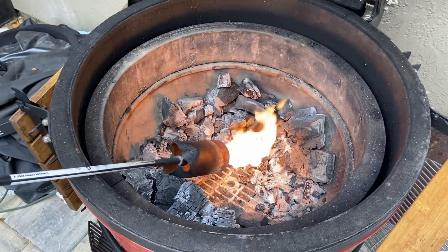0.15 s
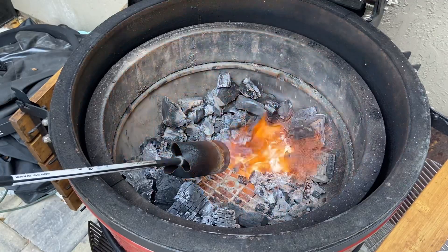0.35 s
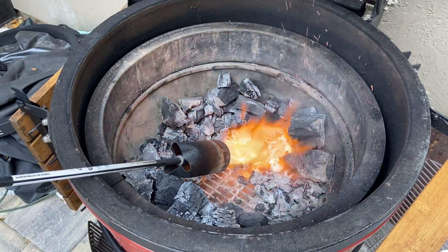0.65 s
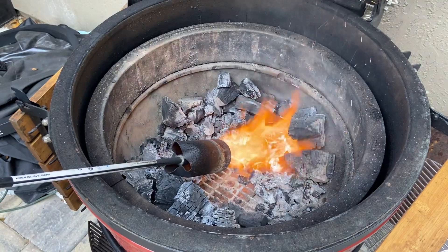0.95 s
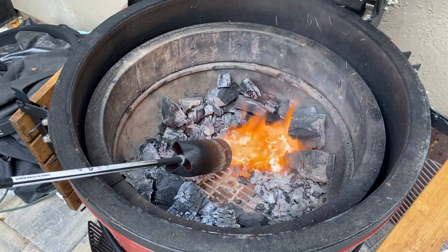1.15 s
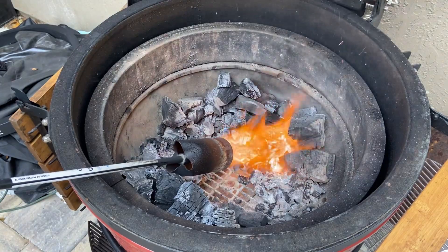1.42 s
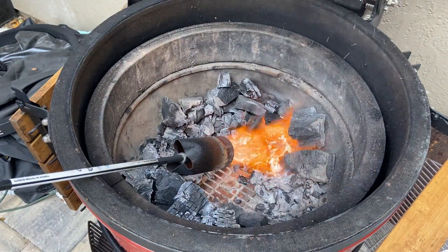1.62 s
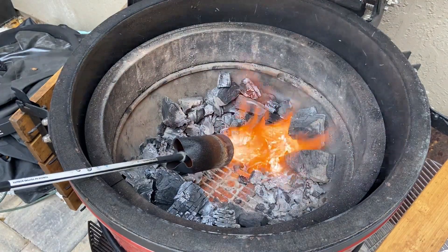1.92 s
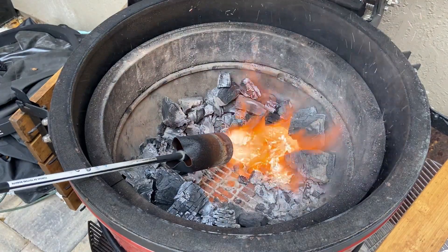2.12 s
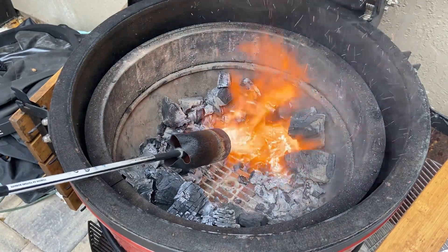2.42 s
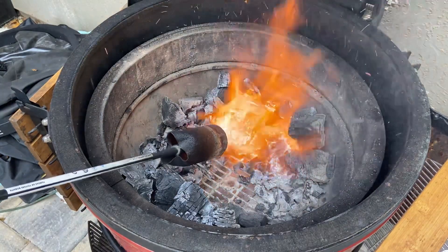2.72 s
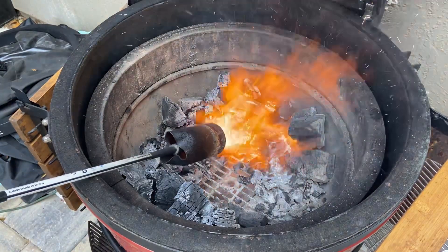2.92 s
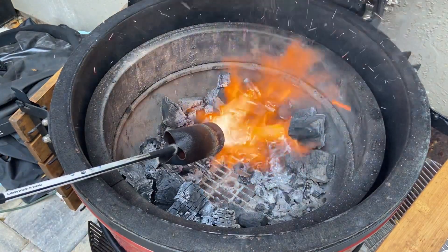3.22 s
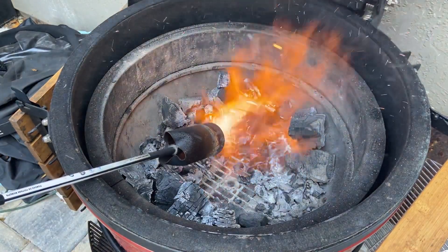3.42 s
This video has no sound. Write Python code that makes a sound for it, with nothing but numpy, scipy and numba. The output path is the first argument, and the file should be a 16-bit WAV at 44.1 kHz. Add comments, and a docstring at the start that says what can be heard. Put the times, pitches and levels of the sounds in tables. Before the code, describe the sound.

A gas torch burns very quietly for an instant, then bursts into a loud, deep, hollow roar inside a charcoal grill bowl. It flutters and shifts in tone, easing near the end; close stereo microphone outdoors.

```python
"""In a deep ceramic grill bowl, a gas torch flares from pilot to full blast into lump charcoal.
Noise for the turbulent burning rings the bowl, the coals and the burner cup; filtered clicks are sparks.
Brighter noise makes the rush through the gaps in the coals and the hiss of the gas jet.
As the torch moves over the coals the resonances shift. Two microphone ports hear it,
under a soft ceiling."""
import sys
import numpy as np
from scipy import signal
from scipy.fft import rfft, irfft, next_fast_len
from scipy.io import wavfile
from scipy.ndimage import uniform_filter1d
from numba import njit

SR = 44100
rng = np.random.default_rng(int(sys.argv[2]) if len(sys.argv) > 2 else 0)


def makeup_ratio(level_db):
    """Linear amplitude ratio for a level in decibels (20 dB per factor of ten)."""
    decades = np.asarray(level_db, float) / 20
    return 10 ** decades


def inscribe(sig):
    """Save sig as 16-bit PCM at rate SR to the path in sys.argv[1].

    A 1-D sig is mono; a 2-D sig holds one channel per row.
    Samples are clipped to [-1, 1] before scaling.
    """
    pcm = np.round(np.clip(np.atleast_2d(sig).T, -1, 1) * 32767)
    wavfile.write(sys.argv[1], SR, pcm.astype(np.int16))


N = 156555  # length in samples


def rms_one(x):
    """Scale to unit power."""
    return x / np.sqrt(np.mean(x ** 2) + 1e-20)


def in_time(rows):
    """Join the points of each column by straight lines, one value per sample."""
    s, *columns = np.transpose(rows)
    return [np.interp(np.arange(N) / SR, s, c) for c in columns]


def drift(rate_hz):
    """Random wavering around 0 with a spread of 1; a higher rate wavers faster."""
    hop, settle = 40, 2000  # samples per step, first steps thrown away
    r = np.exp(-2 * np.pi * hop * rate_hz / SR)
    noise = rng.standard_normal(N // hop + settle + 2)
    slow = signal.lfilter([1], [1, -2 * r, r * r], noise)[settle:]
    return np.interp(np.arange(N) / hop, np.arange(len(slow)), rms_one(slow))


def colour(x, points):
    """Weight a spectrum by straight lines on a log-frequency axis."""
    size = next_fast_len(N)
    hz, db = np.transpose(points)
    f = np.arange(size // 2 + 1) * SR / size + 1  # 1 Hz up, so that the log exists
    weight = makeup_ratio(np.interp(np.log(f), np.log(hz), db))
    return rms_one(irfft(rfft(x, size) * weight, size)[:, :N])


@njit
def moving_peak(x, w, half_width, gain):
    """Add a share of a gliding band-pass: a peak if positive, a dip if negative."""
    out = np.empty_like(x)
    for c in range(x.shape[0]):
        x1 = x2 = y1 = y2 = 0.0
        for i in range(x.shape[1]):
            r = np.exp(-half_width[i])
            y = (1 - r * r) / 2 * (x[c, i] - x2) + 2 * r * np.cos(w[i]) * y1 - r * r * y2
            x2, x1, y2, y1 = x1, x[c, i], y1, y
            out[c, i] = x[c, i] + gain[i] * y
    return out


def resonate(x, hz, width_hz, gain):
    """Pass a sound through one moving resonance, with its settings in Hz."""
    return moving_peak(x, 2 * np.pi * hz / SR, np.pi * width_hz / SR, gain)


def turbulence(spectrum, resonances, travel, wander, swell_db, swell_hz):
    """Two unrelated noises with one colour, through wavering resonances that follow the torch."""
    wander_hz = 4.8  # how fast the resonances waver in pitch
    x = colour(rng.standard_normal((2, N)), spectrum)
    for start_hz, end_hz, width_hz, start_db, end_db in resonances:
        hz = start_hz + (end_hz - start_hz) * travel
        hz = hz * (1 + wander * drift(wander_hz))
        db = start_db + (end_db - start_db) * travel + swell_db * drift(swell_hz)
        x = resonate(x, hz, np.full(N, width_hz), makeup_ratio(db) - 1)
    return rms_one(x)


def evened(x, share, span_s):
    """Level evening, as a steadily fed flame holds its level: swells are partly divided out."""
    span = int(span_s * SR)
    power = uniform_filter1d(uniform_filter1d(x[0] ** 2, span), span)
    return rms_one(x / (power + 0.046) ** (share / 2))


def placed(x, lean, own_db):
    """Lean a shared-and-unshared pair to one side and widen or narrow it."""
    shared, own = x
    return np.array([shared, makeup_ratio(own_db) * own + lean * shared])


def bowl_boom(travel):
    """Low turbulent burning rings the air in the deep bowl."""
    # colour of the noise: pitch_hz, level_db
    spectrum = [(20, -48), (40, -13), (65, -4), (100, -5.5), (200, -2.5), (330, -8), (450, -22.5),
                (900, -61)]
    # bowl resonances and dips along the torch's travel: start_hz, end_hz, width_hz, start_db, end_db
    resonances = [(133.2, 146, 34.2, 15, 15), (252.4, 297, 62, 15.5, 19), (180.3, 202.3, 52, -17.5, -8),
                  (319, 332.4, 84, -43, -48)]
    boom = turbulence(spectrum, resonances, travel, wander=0.014, swell_db=0.3, swell_hz=2.5)
    return evened(boom, share=0.24, span_s=0.07)


def coal_roar(travel):
    """Mid-pitched turbulent burning sounds through the resonances of the coals."""
    # colour of the noise: pitch_hz, level_db
    spectrum = [(200, -39), (310, -19), (360, 0), (700, 0.5), (1000, 1.5), (1250, -7.5), (1500, -62),
                (3000, -53)]
    # coal resonances and dips along the torch's travel: start_hz, end_hz, width_hz, start_db, end_db
    resonances = [(340, 464, 57, 9.5, 2.5), (600, 524, 74, 8, 10.5), (492, 576, 30, 2, -10.5),
                  (718, 860, 145, -1.5, -3)]
    return turbulence(spectrum, resonances, travel, wander=0.016, swell_db=0.37, swell_hz=5.4)


def burner_cup():
    """Turbulent noise passes three times through the cup's air resonance."""
    # cup resonance: time_s, pitch_hz, width_hz of one pass, lean to the left (0-1), unshared_db
    cup = [(0, 1145, 203, 0, 12), (.35, 1100, 170, 0, -15), (.5, 1167, 149, 0, -6), (.75, 1126, 138, 0, -6),
           (1.1, 1173, 157, 0, -14), (1.4, 1153, 169, 0, -2), (1.8, 1114, 260, 0.2, -1),
           (2.45, 1170, 306, .02, 2), (2.56, 1070, 74.6, 0.9, 6), (3.55, 1080, 79, 0.9, 0)]
    hz, width_hz, lean, own_db = in_time(cup)
    hz = hz * (1 + 0.0048 * drift(24.0))
    x = rng.standard_normal((2, N))
    for _ in range(3):
        x = resonate(x, hz, width_hz, np.ones(N)) - x  # only the band-pass is left
    x = rms_one(x / np.sqrt(width_hz))  # a wider band would be louder
    return placed(evened(x, share=0.25, span_s=0.071), lean, own_db)


def sparks():
    """Hot charcoal spits small snaps: filtered clicks at chance moments, uneven in size."""
    sparks_per_s = 200  # in each of the two channels
    sizes = makeup_ratio(4.7 * np.minimum(rng.exponential(1, (2, N)), 4))
    signs = rng.choice([-1, 1], (2, N))
    clicks = sizes * signs * (rng.random((2, N)) < sparks_per_s / SR)
    band = signal.butter(2, [2000, 9000], "band", fs=SR, output="sos")
    return rms_one(signal.sosfilt(band, clicks + 1e-18))


def rush_with_sparks(travel):
    """Burning gas rushes through gaps and past a rim, each a resonance; sparks are mixed in."""
    # colour of the noise: pitch_hz, level_db
    spectrum = [(900, -11.5), (1250, -1.5), (1400, 0), (2500, -5), (3500, -12), (5000, -14.5),
                (6500, -18.5), (9000, -16.5)]
    # gap resonances and dips along the torch's travel: start_hz, end_hz, width_hz, start_db, end_db
    gaps = [(1430, 1610, 124, -1, 8), (1656, 1740, 79, -19, -15), (1840, 1950, 230, 6, 1),
            (2920, 2770, 240, -3, -4), (3450, 3320, 167, 7, 6.5), (5470, 5230, 360, 3, 2.5)]
    # rim resonance on a path of its own: time_s, pitch_hz, peak_db
    rim = [(0, 2520, 9), (1.3, 2540, 8), (2.2, 2150, 4), (3.0, 2330, 2), (3.5, 2500, 12)]
    # gain of the upper part of the rush: time_s, gain_db
    upper_gain = [(0, 8), (.15, 0.5), (.9, 0.1), (1.4, -0.5), (2.35, 0.5), (2.6, 2.7), (3.0, 0.5),
                  (3.3, 1.5), (3.5, 4.5)]
    spark_db, rim_width_hz, upper_hz = -21.5, 84, 2870  # sparks are set against the rush

    rush = turbulence(spectrum, gaps, travel, wander=0.0098, swell_db=2.5, swell_hz=5.8)
    rush = rush + makeup_ratio(spark_db) * sparks()
    rim_hz, rim_db = in_time(rim)
    rush = resonate(rush, rim_hz, np.full(N, rim_width_hz), makeup_ratio(rim_db) - 1)
    high_pass = signal.butter(3, upper_hz, "high", fs=SR, output="sos")
    upper = signal.sosfiltfilt(high_pass, rush)
    return rush + (makeup_ratio(in_time(upper_gain)[0]) - 1) * upper


def jet_hiss(travel):
    """The gas jet hisses: bright turbulent noise through the nozzle's resonances."""
    # colour of the noise: pitch_hz, level_db
    spectrum = [(3000, -28), (5500, 0.5), (6500, -3), (9000, 5.5), (12000, 4), (14000, 6), (16500, -0.5)]
    # nozzle resonances and dips along the torch's travel: start_hz, end_hz, width_hz, start_db, end_db
    resonances = [(6400, 5850, 840, 8.5, -2), (7100, 6850, 250, 8.5, 6.5), (9470, 10040, 200, 6.5, 3)]
    return turbulence(spectrum, resonances, travel, wander=0.016, swell_db=4.0, swell_hz=18.0)


def ports(x):
    """Shared and unshared sound dealt to the two microphone ports, with their balance and lag."""
    # how the ports compare: pitch_hz, likeness (0-1), left_minus_right_db
    port_rows = [(30, 1, 0), (75, 0.91, -0.5), (129, 1, 1.9), (316, 0.93, 0.7), (675, 0.82, 3.5),
                 (1170, 0.82, 1.5), (2300, 0.84, -0.5), (4030, 0.63, 4), (5600, 0.17, 2.5), (6600, 0.62, 1),
                 (8850, 1, 0)]
    # how far the left port leads: pitch_hz, lead_radians
    lead_rows = [(0, 0.0), (900, -.05), (2760, .6), (3900, .3), (6950, 0)]
    treble_lag_ms = 0.239  # above the last lead row the left port hears later

    size = next_fast_len(N)
    f = np.arange(size // 2 + 1) * SR / size
    shared, own = rfft(x, size)
    hz, alike, db = np.transpose(port_rows)
    alike = np.clip(np.interp(f, hz, alike), 0, 1)
    db = np.interp(f, hz, db)
    treble = np.maximum(f - lead_rows[-1][0], 0)
    lead = np.interp(f, *np.transpose(lead_rows)) - 2 * np.pi * treble_lag_ms / 1000 * treble
    middle = np.sqrt((1 + alike) / 2) * shared
    side = np.sqrt((1 - alike) / 2) * own
    tilt = makeup_ratio(db / 2) * np.exp(0.5j * lead)  # half the difference goes to each port
    return irfft([(middle + side) * tilt, (middle - side) / tilt], size)[:, :N]


def scene():
    """Five layers of the flame, flickering partly together."""
    # layer levels before flicker: time_s, boom_db, roar_db, burner_cup_db, rush_db, jet_hiss_db
    blast = [(0.0, -33.5, -40.5, -38, -50, -61), (0.09, -36.5, -40, -41, -52, -54),
             (0.14, -15, -26, -23, -37, -40), (0.2, -10, -17, -17, -25, -36),
             (0.4, -10, -18, -18.5, -28.5, -36.5), (1.0, -10.5, -21, -18.5, -31, -40),
             (1.29, -12, -24.5, -26, -31.5, -40), (1.54, -12, -23, -22.5, -27.5, -37.5),
             (1.82, -8, -17.5, -22.5, -22, -34), (1.91, -8.5, -19, -22, -26.5, -28),
             (2.39, -11.5, -20, -23.5, -22, -36.5), (2.6, -12.5, -22, -28, -28, -31),
             (2.73, -9.5, -22, -27.5, -26, -36), (2.81, -8, -22, -31, -27, -34),
             (2.88, -11.5, -21, -26, -25, -29.5), (3.02, -13, -20.5, -29, -26, -35),
             (3.14, -13.5, -21, -26.5, -27.5, -36), (3.33, -16, -28, -42, -34, -32),
             (3.38, -12.5, -24.5, -21, -30.5, -34.5), (3.49, -16, -29, -41, -38.5, -38),
             (3.55, -14, -30, -31, -32.5, -40)]
    # torch travel across the bowl: time_s, share of the way (0-1)
    travel_rows = [(0, 0), (1.1, 0.13), (1.5, 0.3), (2.2, 0.6), (2.45, 0.84), (2.6, 1), (3.55, 0.74)]
    # roar and rush draw to the middle late on: time_s, lean to the left (0-1), unshared_db
    centring_rows = [(0, 0.0, -1), (2.3, 0.2, -2), (2.8, 0.1, -7), (3.55, 0, -3.5)]

    boom_db, roar_db, cup_db, rush_db, hiss_db = in_time(blast)
    travel = np.clip(in_time(travel_rows)[0], 0, 1)
    centring = in_time(centring_rows)

    # flicker and the faster flutter are shared by several layers
    flicker, flutter = drift(5.6), drift(42.0)
    boom_db = boom_db + 0.5 * flicker
    roar_db = roar_db + 0.091 * flicker + 0.33 * flutter
    cup_db = cup_db + 0.66 * flicker + 0.65 * drift(23.0)
    rush_db = rush_db + 0.69 * flicker + 0.5 * flutter
    hiss_db = hiss_db + 0.4 * flicker + 1.0 * flutter + 0.8 * drift(10.0)

    flame = makeup_ratio(boom_db) * bowl_boom(travel)
    flame += makeup_ratio(roar_db) * placed(coal_roar(travel), *centring)
    flame += makeup_ratio(cup_db) * burner_cup()
    flame += makeup_ratio(rush_db) * placed(rush_with_sparks(travel), *centring)
    flame += makeup_ratio(hiss_db) * jet_hiss(travel)
    return ports(flame)


def top_cut(x):
    """Nothing passes above the cut-off."""
    return signal.sosfilt(signal.butter(12, 17080, fs=SR, output="sos"), x)


def record(dry):
    """A soft ceiling rounds the peaks, then a steep low-pass cuts the top."""
    ceiling, cutoff_hz = 1.12, 15720  # ceiling as a sample value
    rounded = ceiling * np.tanh(dry / ceiling)
    low_pass = signal.ellip(12, 0.3, 80, cutoff_hz, fs=SR, output="sos")
    mix = signal.sosfilt(low_pass, rounded)
    return top_cut(mix)


dry = scene()
out = record(dry)
inscribe(out)
```